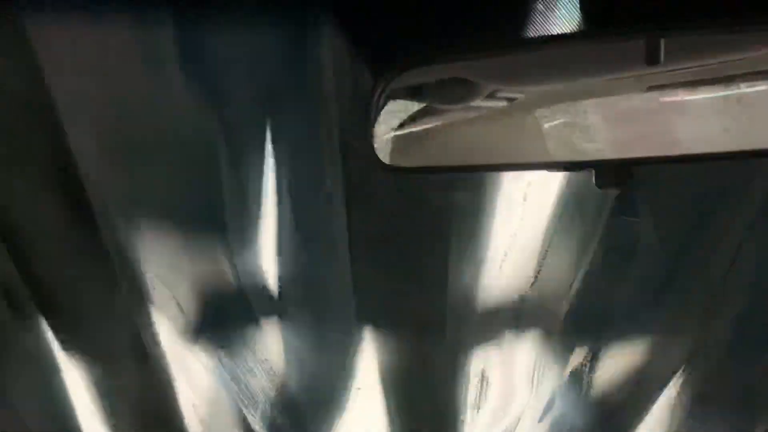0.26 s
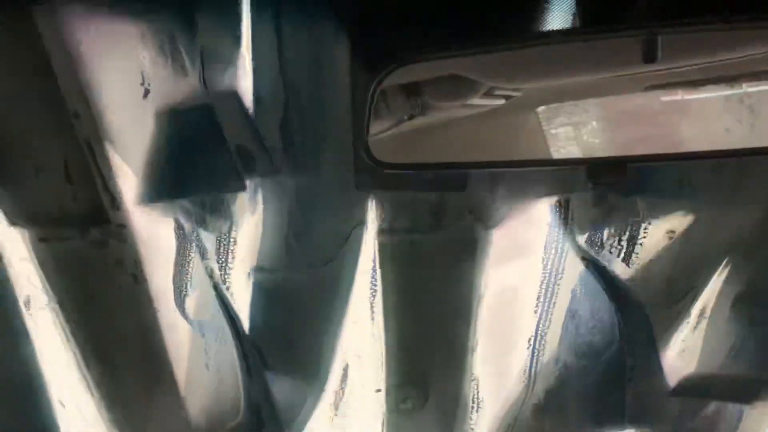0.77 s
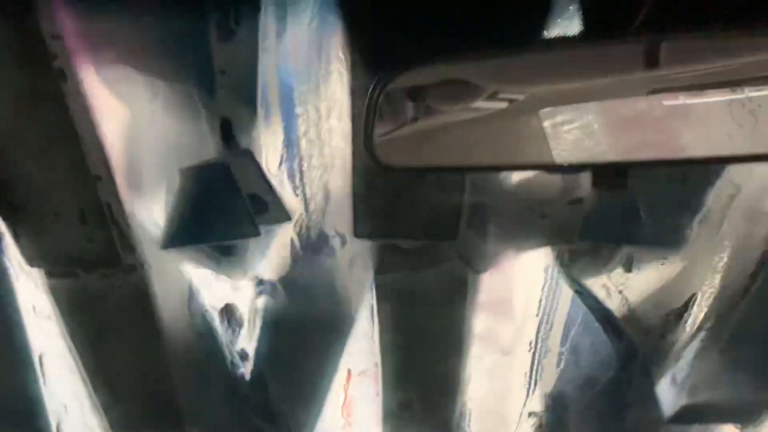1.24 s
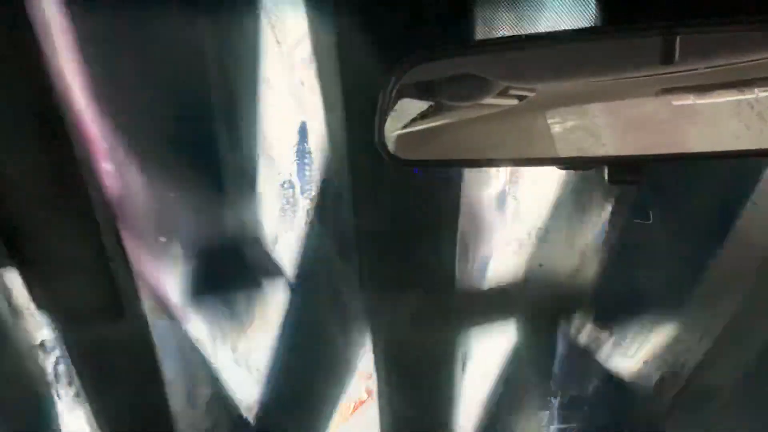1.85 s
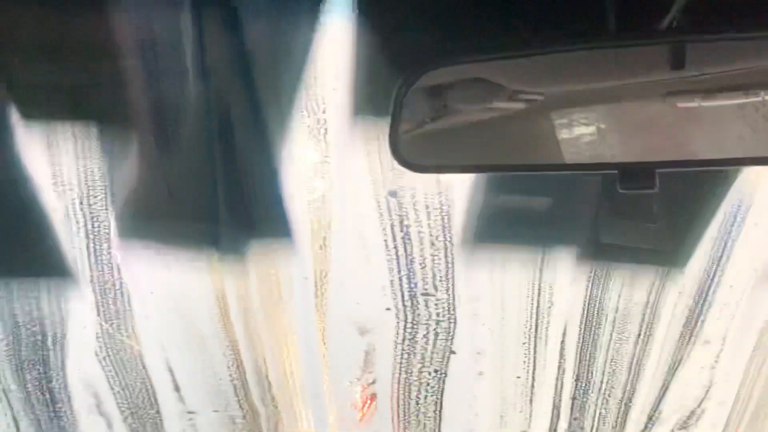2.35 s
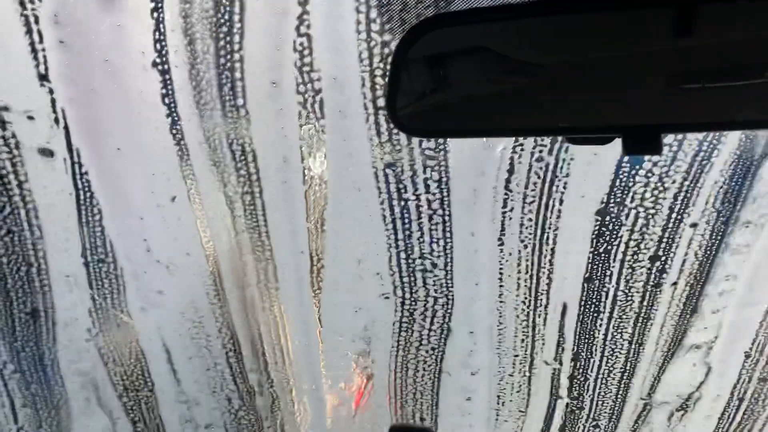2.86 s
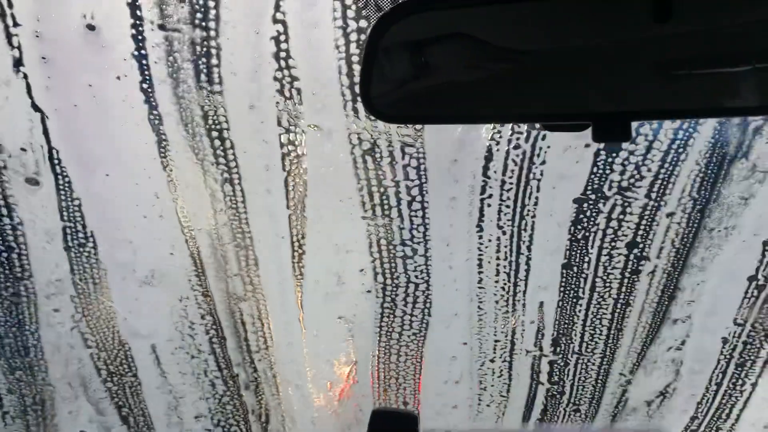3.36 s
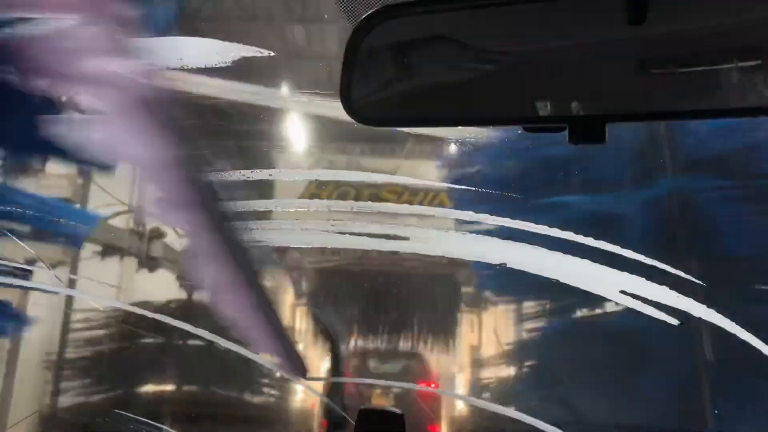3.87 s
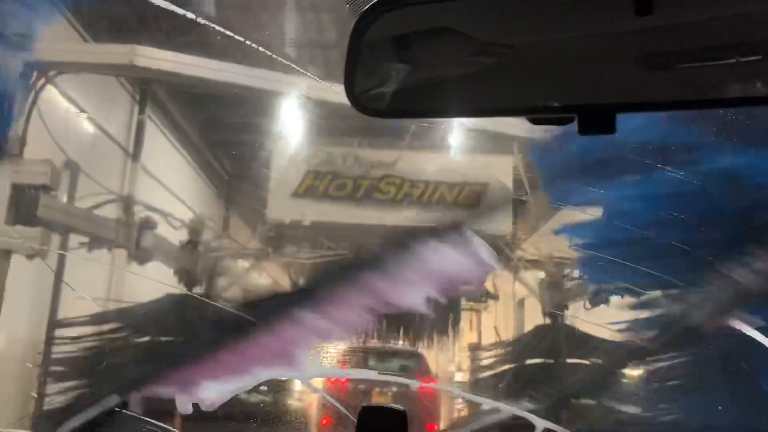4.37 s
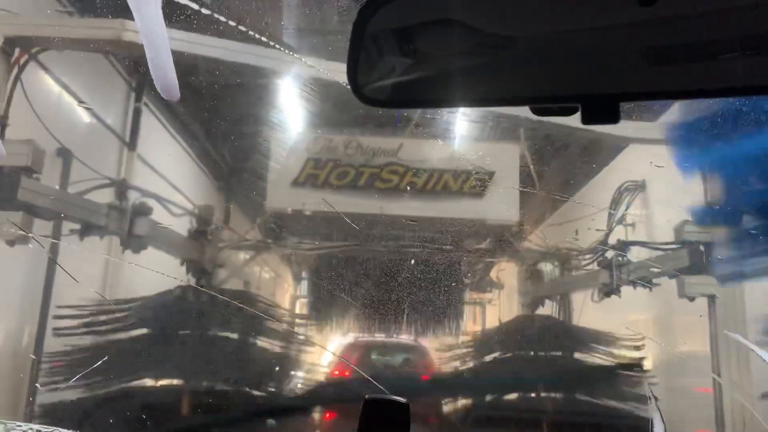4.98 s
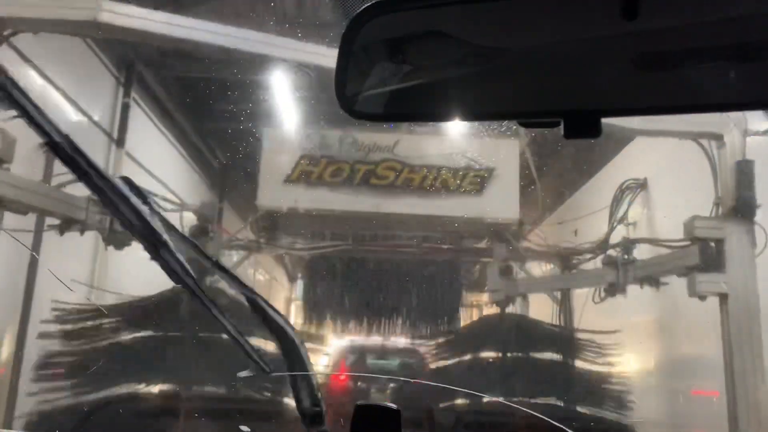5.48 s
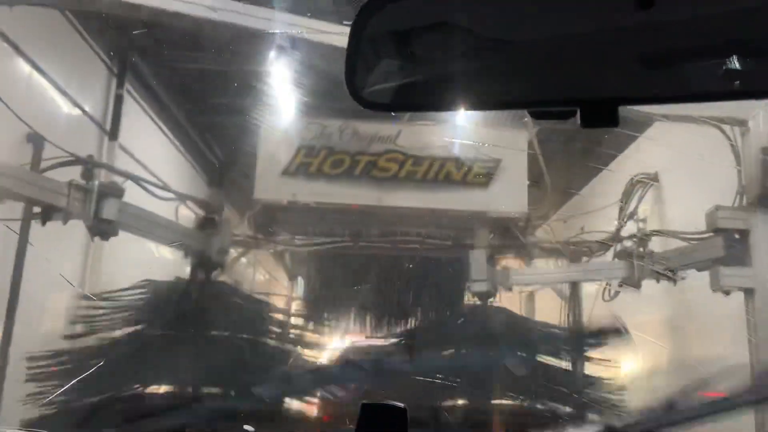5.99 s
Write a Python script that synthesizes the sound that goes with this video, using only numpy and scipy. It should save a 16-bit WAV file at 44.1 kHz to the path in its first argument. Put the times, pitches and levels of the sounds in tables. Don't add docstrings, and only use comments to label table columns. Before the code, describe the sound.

A phone on the front seat picks up the low, heaving boom of cabin air shaken by wash machinery. Over it, muffled cloth drumming and thin watery hiss continue, first with curtain strips slapping the roof, then a sharp bouncing knock. Side brushes follow with quicker wet whips, a swelling boom, a rough scrub near five seconds, then thuds, crisp splashes and denser, louder brushing.

```python
import sys
import numpy as np
from scipy import signal
from scipy.fft import rfft, irfft, next_fast_len
from scipy.io import wavfile
from scipy.ndimage import uniform_filter1d, map_coordinates

SR = 44100
rng = np.random.default_rng(int(sys.argv[2]) if len(sys.argv) > 2 else 0)


def transcribe(u):
    v = np.clip(np.atleast_2d(u).T, -1, 1)
    q = np.round(v * 32767).astype(np.int16)
    wavfile.write(sys.argv[1], SR, q)


def gain_from_decibels(decibels):
    exponent = np.asarray(decibels, float) / 20
    return 10 ** exponent


N = 274743

# t/s, level/dB
MACHINE_LOAD = [(0.0, -19), (0.36, -18), (0.68, -23), (1.61, -18.5), (2.31, -22), (2.83, -22.5),
                (3.24, -21.5), (3.61, -20), (3.71, -14.5), (3.82, -19), (4.46, -18.5), (4.89, -18.5),
                (6.23, -17)]
# t/s, peak level/dB
LURCHES = [(.17, -20.5), (.31, -26.5), (.48, -21), (.68, -23.5), (.88, -23), (1.15, -26.5), (1.5, -24.5),
           (1.77, -23.5), (2.06, -28), (2.22, -20), (2.46, -25), (2.85, -25.5), (3.05, -25), (3.45, -25),
           (3.7, -25), (3.92, -19.5), (4.13, -23.5), (4.34, -23), (4.53, -29), (5.27, -16.5), (5.33, -25),
           (5.64, -19.5), (5.88, -19.5), (6.0, -27), (6.16, -20)]
# t/s, peak level/dB
LENGTH_SURGES = [(.28, -32), (.7, -29), (1.21, -27), (1.68, -23), (1.82, -25), (2.06, -32), (2.6, -26),
                 (2.95, -28), (3.33, -26), (3.9, -26), (4.23, -14), (4.44, -21), (4.65, -16), (4.86, -17.5),
                 (5.0, -23), (5.15, -21), (5.27, -30), (5.45, -17.5), (5.71, -21), (6.0, -21)]
WIDTH_SURGES = [(.17, -21.5), (.54, -28), (.88, -23.5), (1.21, -28), (1.43, -22.5), (1.77, -26),
                (2.01, -19.5), (2.22, -29), (2.58, -21), (2.75, -32), (3.15, -31), (3.52, -22), (3.73, -20),
                (3.87, -17), (4.01, -31), (4.23, -34), (4.34, -18), (4.72, -27.5), (5.45, -26), (5.83, -24),
                (6.11, -26), (6.23, -19)]
HEIGHT_SURGES = [(0, -28), (.3, -31.5), (.6, -35), (.95, -36), (1.75, -28), (2.01, -26), (2.25, -30.5),
                 (2.67, -28.5), (2.95, -29), (3.5, -25), (3.7, -33), (4.0, -28.5), (4.2, -30.5), (4.4, -28),
                 (4.65, -22), (5.15, -23.5), (5.45, -24), (5.71, -20), (5.88, -22.5), (6.14, -20.5)]
# f/Hz, level/dB
SHAKE_COLOUR = [(11, -40.5), (18, -18.5), (38, 8), (65, 1), (84, -52), (140, -120)]
LENGTH_COLOUR = [(45, -41.5), (58, 3.5), (75, 9.5), (95, 10.5), (115, -31), (300, -140)]
WIDTH_COLOUR = [(80, -34), (95, 9.5), (125, 19.5), (150, 5), (180, -25), (450, -140)]
HEIGHT_COLOUR = [(125, -37), (150, 8.5), (185, -3.5), (225, -3), (270, -35.5), (600, -140)]
SHAKE_DB, LENGTH_DB, WIDTH_DB, HEIGHT_DB = -6, -8, -6.5, -12
SURGE_DB_PER_S, UNREST_DB = 106, 1

# t/s, pressure level/dB, wetness level/dB
CLOTH = [(0, -38.5, -18), (.1, -45.5, -15), (.45, -38, -19.5), (.81, -40, -19), (.94, -42.5, -19),
         (1.3, -41.5, -15.5), (1.66, -38, -16.5), (1.91, -36, -16), (2.31, -41.5, -16), (2.64, -34.5, -19),
         (2.98, -40.5, -19), (3.3, -39.5, -19), (3.7, -37, -18), (4.53, -37, -19), (4.89, -34.5, -17.5),
         (5.36, -36.5, -14), (5.69, -32.5, -15), (6.23, -30.5, -15.5)]
# t/s, level/dB
CLOTH_WEIGHT = [(0.0, -37.5), (0.73, -34), (1.16, -39.5), (1.35, -36.5), (1.63, -34), (1.89, -31.5),
                (2.24, -35.5), (2.39, -35), (2.69, -31), (3.0, -37), (3.31, -37.5), (3.5, -35.5),
                (3.7, -32), (4.68, -32.5), (4.82, -31), (5.6, -32), (5.86, -27.5), (6.23, -27.5)]
# f/Hz, level/dB
PANEL_COLOUR = [(130, -30.5), (220, -6.5), (268, -0.5), (330, -5), (411, -5.5), (487, -7.5), (540, -9),
                (588, -7), (748, -14.5), (836, -9), (903, -15), (1030, -13.5), (1120, -12.5), (1240, -23),
                (1700, -30), (2210, -41), (3740, -120)]
DRAG_COLOUR = [(790, -22.5), (1350, 2.5), (1580, -5), (1940, -3.5), (2120, -4.5), (2910, -7.5),
               (3640, -12.5), (5000, -23.5), (6500, -31.5), (11000, -120)]
SPRAY_COLOUR = [(2470, -11.5), (4200, -2.5), (5520, -2.5), (6490, -4), (7440, -7), (8560, -8.5),
                (9150, -9.5), (11300, -24), (14700, -52), (22000, -120)]
MIST_COLOUR = [(8500, -44.5), (10300, -7.5), (11500, -1), (13900, 5), (15100, 3), (15750, 2), (15900, -61)]
DRUM_DB, DRUM_GROWS, MIST_DB, MIST_GROWS = -27, 0.55, -72, .8
DRUM_FEELS_LOAD, SLAP_DRUM_DB = 0.15, 2.5
GLASS_HZ = 500

# f/Hz, width/Hz, level/dB
ROOF_WAY = [(1370, 91, 1.5), (1730, 110, -0.5), (2350, 88, 2.5), (2720, 110, -1), (2970, 70, 1.5),
            (3860, 90, 3), (4600, 60, 4.5), (4850, 90, -4), (5150, 130, 3.5), (5600, 200, -1.5),
            (6400, 100, 0), (7370, 90, -2), (7780, 110, 2), (9500, 150, -3)]
REAR_WAY = [(1860, 52, 2.5), (3000, 90, 0), (3700, 90, -2), (3880, 70, 1.5), (4340, 70, 2.5),
            (4830, 80, -1), (5100, 120, 2), (6060, 70, 1), (7620, 100, 2), (8150, 120, 0), (8870, 90, 1)]
DOORS_WAY = [(265, 20, 2), (600, 30, 2.5), (700, 30, -1.5), (840, 30, 2.5), (974, 54, -3), (1100, 63, 0.5),
             (2950, 70, 0.5), (3700, 70, -4), (3850, 80, 3), (5500, 150, -1.5), (5840, 70, 2),
             (6280, 90, 1), (6660, 80, 2), (6950, 100, -1), (8270, 110, 2), (8600, 120, 0), (8860, 70, 1)]
LEAVES_ROOF_S, REACHES_DOORS_S, CHANGE_S = 2.25, 4.83, 0.22

# t/s, peak level/dB, f/Hz, time to fall 60 dB/s
THUMPS = [(0.011, 0, 440, 0.02), (0.061, -13.5, 253, 0.082), (0.094, -12, 405, 0.033),
          (0.952, -18, 282, 0.3), (0.988, -33, 280, 0.05), (1.019, -11, 323, 0.038),
          (1.107, -9.5, 740, 0.019), (1.86, -21, 326, 0.034), (1.931, -27, 310, 0.029),
          (2.008, -9.5, 347, 0.046), (2.1865, -2, 338, 0.026), (2.615, -16, 335, 0.059),
          (2.942, -3, 280, 0.03), (3.313, -12.5, 286, 0.058), (4.178, -15.5, 292, 0.1),
          (4.2515, -6, 270, 0.045), (4.324, -9, 420, 0.04), (5.102, -11, 299, 0.034),
          (5.287, -16, 310, 0.072), (5.661, -13, 316, 0.086), (5.693, -16, 380, 0.038),
          (5.714, -3, 274, 0.036)]
# t/s, peak level/dB, body level/dB
STRIPS = [(.0892, -44, 13.5), (.2937, -36, 4), (.3606, -45, -6), (.4234, -38, 9), (.5536, -38, 10),
          (.5955, -45, 18.5), (.058, -47, 12), (.6998, -46, 4), (.9931, -44, 6), (1.4591, -41, 6),
          (0.9406, -37.5, 8.5), (1.1059, -48.5, 18.5), (1.3875, -36.5, 10), (1.5569, -31, 4),
          (1.5873, -39.5, 15), (1.651, -27, 5.5), (1.712, -23, 4), (1.7754, -32.5, 12), (1.812, -34, 10),
          (1.8452, -38.5, 15), (2.0043, -35, 12.5), (2.0597, -38, 4), (2.1555, -45, 10), (2.1819, -38, 6),
          (2.369, -47, -1), (2.4844, -35, 7), (2.5316, -37, 12), (2.5805, -37, 9), (2.7182, -45, 4)]
# t/s, peak level/dB, body level/dB
WHIPS = [(3.3787, -40.5, 11), (3.49, -28, 6.5), (3.5827, -32.5, 13), (3.6167, -32.5, 6.5), (3.6586, -34, 9),
         (3.698, -30.5, 10.5), (3.7354, -38, 12), (3.848, -37, 12), (3.816, -39, 4), (3.885, -39, 4),
         (3.9175, -49, 0), (4.089, -28.5, 8), (4.0038, -47, 9), (4.2433, -48, 6), (4.62, -46, 16),
         (5.0843, -31.5, 8.5), (5.149, -30.5, 6.5), (5.223, -26, 6), (5.257, -39, 3), (5.286, -29, 5),
         (5.401, -26, 4), (5.5972, -40, 18), (5.79, -33, 12), (5.804, -20, 5), (5.8594, -40, 11),
         (5.9718, -32, 2), (6.0836, -26.5, 7), (6.1195, -26.5, 6), (6.148, -21.5, 4.5), (6.137, -30, 0)]
# t/s, peak level/dB, body level/dB
SCRUBS = [
    (1.5013, -34, 11),
    (4.888, -28, 4),
    (4.908, -25, 3.5),
    (4.934, -24, 2),
    (4.972, -27.5, 7),
    (5.034, -27.5, 3),
    (6.0387, -26, 6),
]
# t/s, peak level/dB, body level/dB, fizz level/dB
SPLASHES = [(.9163, -34.5, 2, -23), (1.63, -44, 0, -20), (2.0857, -38, 5, -14), (3.1772, -30, -14, -12),
            (3.1917, -27, -15, -19), (3.4171, -34, 0, -28), (3.4471, -32, 0, -28), (3.4714, -33, -8, -14),
            (3.483, -34, -6, -16), (5.037, -33, -6, -20), (5.287, -34, -4, -24), (4.4894, -36, -6, -31),
            (4.5063, -29, -20, -18), (4.8589, -37, -4, -27), (5.0494, -37, 3, -27), (5.3722, -28, 6, -30),
            (5.5348, -45, 0, -28), (5.671, -20, 5.5, -28), (5.676, -19.5, -2, -25), (5.690, -22.5, 6, -30),
            (5.702, -24.5, -5, -15), (5.7314, -18.5, -10, -31), (5.9308, -15.5, 1.5, -28),
            (5.936, -19, 1, -30)]
STRIP_FIZZ_DB, STRIP_S, STRIP_RISE_S = -30, 0.021, .005
WHIP_FIZZ_DB, WHIP_S, WHIP_RISE_S = -24, 0.02, 0.0071
SCRUB_FIZZ_DB, SCRUB_S, SCRUB_RISE_S = -24, 0.044, .008
SPLASH_S, SPLASH_RISE_S = 0.0065, .0025

# t/s, peak level/dB, f/Hz, time to fall 60
# dB/s
TAPS = [(.063, -17.5, 610, 0.034), (.114, -24, 800, 0.023), (.273, -17, 525, .03), (0.825, -20, 370, .04),
        (0.98, -18, 390, 0.044), (1.545, -22, 1310, .04), (1.655, -28, 2250, 0.074), (1.719, -21, 940, .06),
        (1.853, -22, 1110, 0.077), (1.983, -14.5, 403, .04), (2.008, -19, 650, .03), (2.122, -21, 471, .04),
        (2.473, -19, 604, 0.05), (2.539, -25, 477, .05), (2.548, -28.5, 1910, .15), (2.782, -18, 385, .05),
        (3.161, -24, 400, .05), (3.347, -20, 470, .04), (3.502, -20.5, 1160, 0.06),
        (3.597, -23.5, 1166, 0.092), (3.709, -21.5, 1200, 0.06), (4.022, -15, 364, 0.055),
        (4.2525, -10, 480, .04), (4.262, -16, 640, .03), (.094, -21, 635, .025), (.943, -34, 3600, .04),
        (4.3218, -8, 400, 0.035), (4.569, -15.5, 383, 0.053), (5.6775, -33, 6450, .012),
        (5.695, -26, 2900, .025), (5.9312, -24, 3400, .012), (5.934, -23, 3900, .035),
        (5.937, -28, 2600, .03), (5.936, -36, 9000, .015), (1.711, -31, 2980, .06), (1.9, -30, 3000, .06),
        (1.845, -32, 2980, .05), (1.815, -24, 790, .05), (1.61, -25, 1150, .07), (2.8635, -26, 1200, .015),
        (2.942, -21, 1120, .02), (4.267, -17, 650, .025), (2.644, -22, 820, .03), (.067, -25, 1300, .02),
        (6.095, -22, 1860, 0.054), (5.222, -24, 2200, 0.037), (5.152, -24, 2200, 0.035),
        (.94, -29, 2550, .06), (6.15, -21, 1200, 0.029),
        (3.699, -37, 6100, .04), (3.735, -38, 5100, .03), (3.738, -36, 4300, .04),
          (3.418, -38, 5200, .025), (3.448, -42, 7600, .025), (3.495, -35, 4100, .03),
          (3.615, -39, 5100, .025), (4.89, -37, 5700, .05), (5.085, -37, 5700, .04),
          (5.034, -43, 9200, .025), (.943, -35, 3950, .04), (.85, -36, 3600, .04), (.297, -33, 2450, .04),
          (.6, -33, 2400, .08), (.4, -27, 1300, .09), (.615, -26, 1150, .06), (.865, -29, 1450, .04),
          (5.81, -21, 830, .06), (5.865, -22, 840, .06), (5.87, -24, 1110, .05), (5.93, -22, 840, .07),
          (6.025, -18, 600, .08), (5.8, -16, 265, .07), (5.96, -19, 270, .1), (5.9315, -27, 3900, .02),
          (5.938, -27, 3300, .025), (5.934, -31, 5000, .015), (2.008, -22, 900, .02),
          (.0625, -20, 750, .02), (.0935, -20, 800, .018), (5.226, -28, 2700, .03), (5.375, -31, 2400, .03),
          (1.78, -33, 4600, .04), (1.66, -33, 3850, .05), (1.655, -33, 3000, .04), (1.935, -32, 2950, .06),
          (5.65, -20, 650, .06), (6.04, -24, 1090, .06)]
# t/s, level/dB
JET = [
    (2.08, -98),
    (2.17, -71),
    (2.38, -70),
    (2.48, -90),
]
# f/Hz, level/dB
JET_COLOUR = [(12900, -60), (13700, -6), (14300, 0), (14900, -8), (15500, -60)]
# t/s, level/dB
HARD_KNOCK = [
    (2.1796, -5),
    (2.1824, -11),
    (2.1852, -10),
    (2.1965, -21),
    (2.221, -23),
]
# f/Hz, level/dB, time to fall 60 dB/s
TRIM = [(310, -9, 0.02), (776, -12, 0.07), (877, -12, 0.06), (1007, -14, .04), (1118, 0, 0.034),
        (1460, -9, 0.02), (1954, -11, 0.024), (2300, -19, 0.025), (2570, -24, .02), (3050, -27, 0.025)]


def unit(x):
    return x / np.sqrt(np.mean(x ** 2) + 1e-20)


def curves(rows):
    s, *columns = np.transpose(rows)
    return [np.interp(np.arange(N) / SR, s, column) for column in columns]


def wobble(rate):
    return map_coordinates(rng.standard_normal(int(N * rate / SR) + 4), [np.arange(N) * rate / SR])


def smooth(x, size):
    return np.abs(uniform_filter1d(uniform_filter1d(x, size), size))


def rush(colour, patchy_db):
    z = signal.stft(rng.standard_normal(N), nperseg=512)[2]
    patches = uniform_filter1d(rng.standard_normal(z.shape), size=5, axis=0)
    patches = uniform_filter1d(patches, size=8, axis=1)
    x = signal.istft(z * gain_from_decibels(patchy_db * unit(patches)), nperseg=512)[1][:N]
    m = next_fast_len(N + 8192)
    hz, db = np.transpose(colour)
    gain = gain_from_decibels(np.interp(np.log(np.fft.rfftfreq(m, 1 / SR) + 1), np.log(hz + 1), db))
    return unit(irfft(rfft(x, m) * gain, m)[:N])


def patter(rate, t60, spread_db):
    chance, size = rng.random((2, N))
    hits = (chance < rate / SR) * gain_from_decibels(-2 * spread_db * np.log(size + .03))
    power = smooth(signal.lfilter([1], [1, -gain_from_decibels(-120 / (t60 * SR))], hits), 130)
    return power / power.mean()


def even(x, seconds):
    return x / np.sqrt(smooth(x ** 2, round(seconds * SR)) + 0.05)


def ring(hz, t60, attack):
    t = np.arange(SR // 4) / SR
    return gain_from_decibels(-60 * t / t60) * (1 - np.exp(-t / attack)) * np.sin(2 * np.pi * hz * t)


def surging(steady_db, surges):
    s, db = np.transpose(surges)
    t = np.arange(0, N + 64, 64) / SR
    swell = gain_from_decibels(2 * (db[:, None] - SURGE_DB_PER_S * np.abs(t - s[:, None]))).sum(axis=0)
    steady = gain_from_decibels(2.144 * (curves(MACHINE_LOAD)[0] + steady_db + UNREST_DB * wobble(4.7)))
    return np.sqrt(steady + np.interp(np.arange(N) / SR, t, swell))


def air_note(hz, colour, tone):
    phase = 2 * np.pi * np.cumsum(hz * (1 + .07 * wobble(8))) / SR
    rumble = even(rush(colour, patchy_db=0.0), 0.063)
    return unit(np.sqrt(2 * tone) * np.sin(phase) + np.sqrt(1 - tone) * rumble)


def boom():
    shake = unit(even(rush(SHAKE_COLOUR, patchy_db=-5.5), 0.056))
    height = unit(even(rush(HEIGHT_COLOUR, patchy_db=-1.0), 0.066))
    return (surging(SHAKE_DB, LURCHES) * shake
            + surging(LENGTH_DB, LENGTH_SURGES) * air_note(75, LENGTH_COLOUR, tone=.42)
            + surging(WIDTH_DB, WIDTH_SURGES) * air_note(128, WIDTH_COLOUR, tone=.2)
            + surging(HEIGHT_DB, HEIGHT_SURGES) * height)


def way_in(x):
    hz, t = np.fft.rfftfreq(N, 1 / SR), np.arange(N) / SR

    def through(way):
        ripple_db = sum(db * np.exp(-.5 * ((hz - centre) / width) ** 2) for centre, width, db in way)
        return irfft(rfft(x) * gain_from_decibels(ripple_db), N)

    gone = np.clip((t - LEAVES_ROOF_S) / CHANGE_S + .5, 0, 1)
    come = np.clip((t - REACHES_DOORS_S) / CHANGE_S + .5, 0, 1)
    return (1 - gone) * through(ROOF_WAY) + (gone - come) * through(REAR_WAY) + come * through(DOORS_WAY)


def wash():
    drag_db, wet_db = curves(CLOTH)
    load_db, weight_db = curves(MACHINE_LOAD)[0], curves(CLOTH_WEIGHT)[0]
    spray_db = drag_db + wet_db
    drum_db = DRUM_DB + DRUM_GROWS * (drag_db - drag_db.mean()) + DRUM_FEELS_LOAD * (load_db - load_db.mean())
    glass_db = DRUM_DB + weight_db - weight_db.mean()
    mist_db = MIST_DB + MIST_GROWS * (spray_db - spray_db.mean())
    small = patter(80, .05, spread_db=2.1)
    blows = patter(40, .08, spread_db=1.8)
    body, middle, fizz = slaps()
    unrest_db = .5 * wobble(5)

    def grainy(db, share, grain):
        return gain_from_decibels(2 * db) * (1 - share * (1 - grain))

    def struck(db):
        return np.sqrt(grainy(db + unrest_db, .2, blows) + gain_from_decibels(2 * SLAP_DRUM_DB) * body)

    shell = rush(PANEL_COLOUR, patchy_db=.9)
    panels = signal.sosfiltfilt(signal.butter(4, GLASS_HZ, fs=SR, output='sos'), shell)
    drum = struck(drum_db) * panels + struck(glass_db) * (shell - panels)
    drag = np.sqrt(grainy(drag_db, .25, small) + body) * rush(DRAG_COLOUR, patchy_db=.9)
    spray = np.sqrt(grainy(spray_db, .4, small) + middle) * rush(SPRAY_COLOUR, patchy_db=1.1)
    mist = np.sqrt(grainy(mist_db, .3, small) + fizz) * rush(MIST_COLOUR, patchy_db=1.2)
    return way_in(drum + drag + spray) + mist


def thumps():
    out = np.zeros(N + SR)
    for s, db, hz, t60 in THUMPS:
        sound = ring(hz, t60, .0012) + .5 * ring(1.55 * hz, .6 * t60, .0012)
        out[round(s * SR):][:len(sound)] += gain_from_decibels(db - 3) * sound
    return out[:N]


def slaps():
    power, t = np.zeros((3, N + SR)), np.arange(SR // 4) / SR
    contacts = [row + (STRIP_FIZZ_DB, STRIP_S, STRIP_RISE_S) for row in STRIPS]
    contacts += [row + (WHIP_FIZZ_DB, WHIP_S, WHIP_RISE_S) for row in WHIPS]
    contacts += [row + (SCRUB_FIZZ_DB, SCRUB_S, SCRUB_RISE_S) for row in SCRUBS]
    contacts += [row + (SPLASH_S, SPLASH_RISE_S) for row in SPLASHES]
    for s, db, body_db, fizz_db, contact_s, rise_s in contacts:
        rise = np.sin(np.pi / 2 * np.minimum(t / rise_s, 1)) ** 2
        shape = rise * gain_from_decibels(-60 * np.maximum(t - contact_s, 0) / 0.071 - 270 * t)
        levels = gain_from_decibels(db - 14.0 + np.array([body_db + 6, 0, fizz_db + 3.5]))
        start = round((s - .65 * rise_s) * SR)
        power[:, start:][:, :len(t)] += np.outer(levels, shape) ** 2
    return power[:, :N]


def taps():
    out = np.zeros(N + SR)
    for s, db, hz, t60 in TAPS:
        sound = ring(hz, t60, .0015)
        out[round(s * SR):][:len(sound)] += gain_from_decibels(db) * sound
    return out[:N]


def nozzle():
    return gain_from_decibels(curves(JET)[0]) * rush(JET_COLOUR, patchy_db=1.5)


def hard_knock():
    out = np.zeros(N + SR)
    sound = sum(gain_from_decibels(level) * ring(hz, t60, .0008) for hz, level, t60 in TRIM)
    for s, db in HARD_KNOCK:
        out[round(s * SR):][:len(sound)] += gain_from_decibels(db) * sound
    return out[:N]


def cabin(x):
    t = np.arange(SR // 8) / SR
    tail = rng.standard_normal(len(t)) * gain_from_decibels(-60 * t / .09) * (t > .002)
    return x + gain_from_decibels(-12) * signal.fftconvolve(x, tail / np.linalg.norm(tail))[:N]


def scene():
    outside = wash() + thumps() + taps() + nozzle() + hard_knock()
    return (boom() + gain_from_decibels(-0.74) * cabin(outside))[None]


def roll_off(x):
    return signal.sosfilt(signal.butter(12, 15880, fs=SR, output="sos"), x)


def record(dry):
    soft = dry / (1 + np.abs(dry / .75) ** 4) ** (1 / 4)
    return roll_off(soft)


dry = scene()
out = record(dry)
transcribe(out)
```